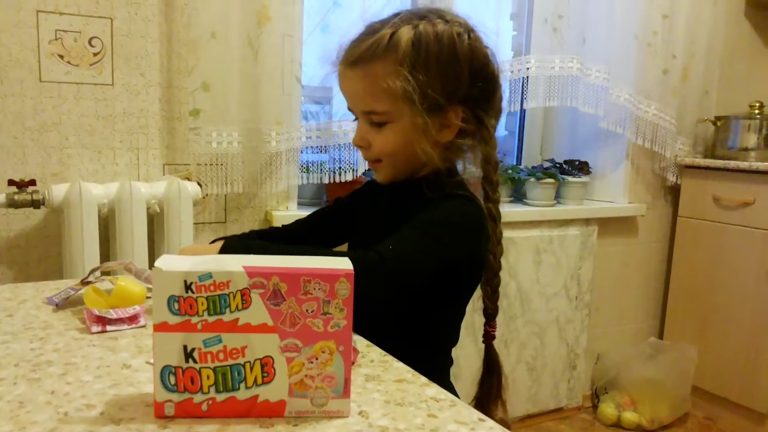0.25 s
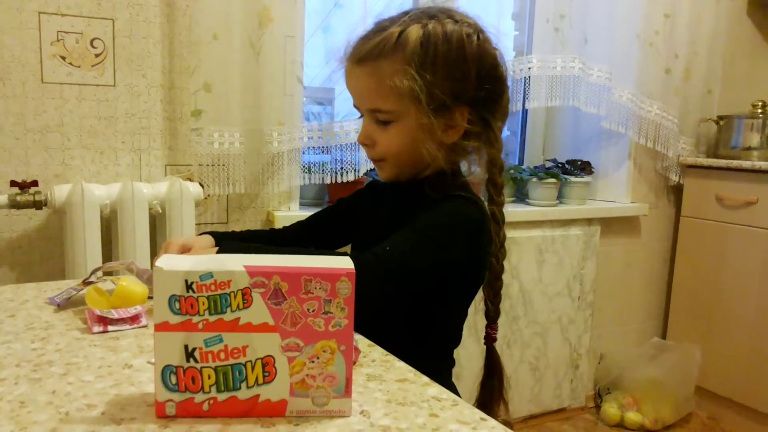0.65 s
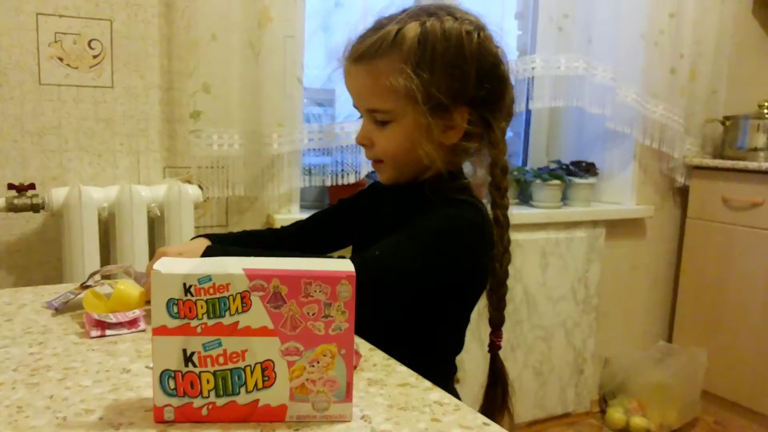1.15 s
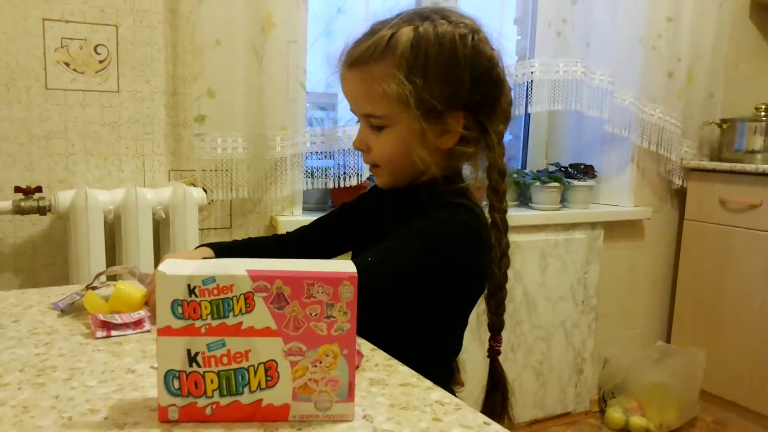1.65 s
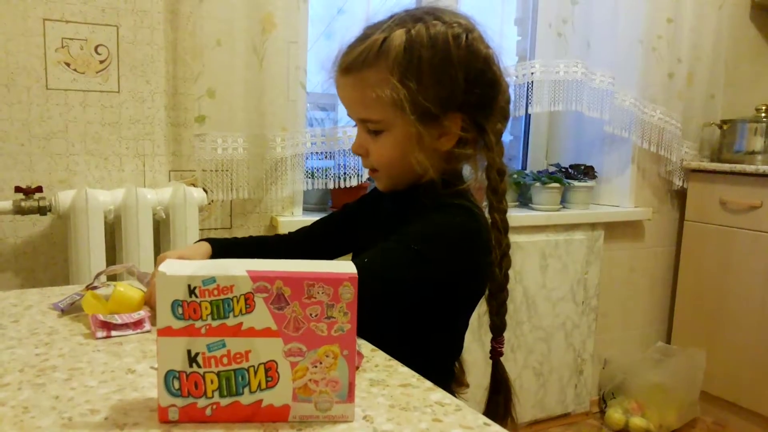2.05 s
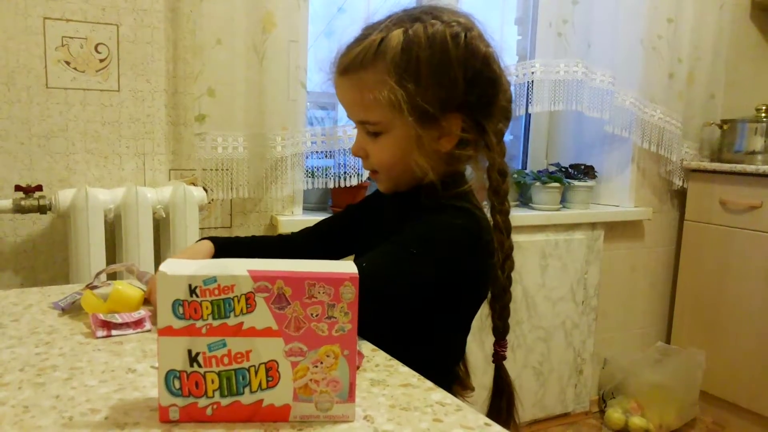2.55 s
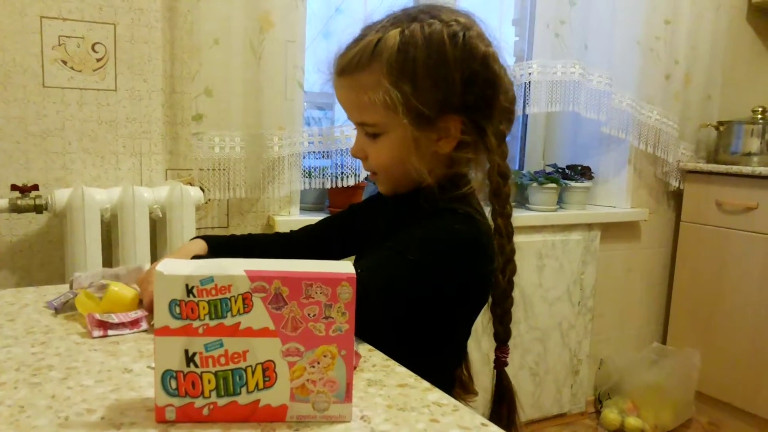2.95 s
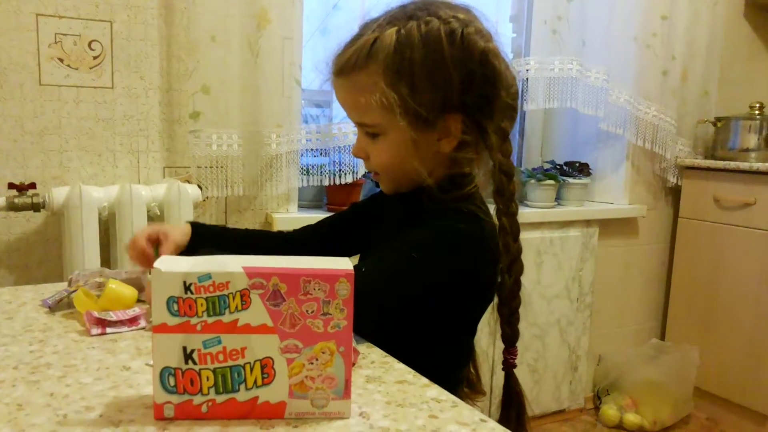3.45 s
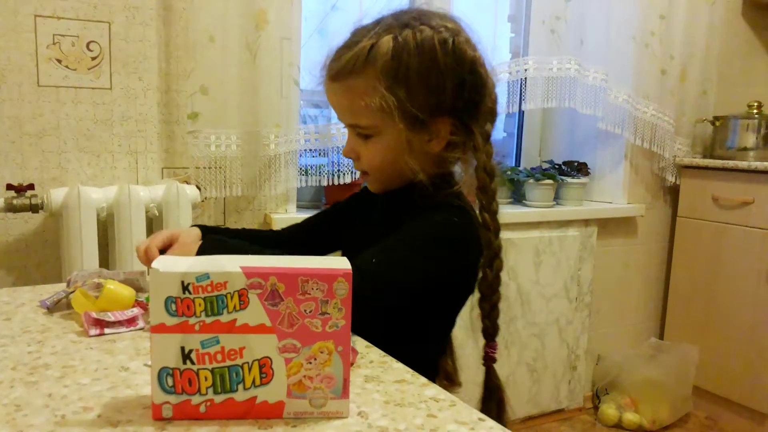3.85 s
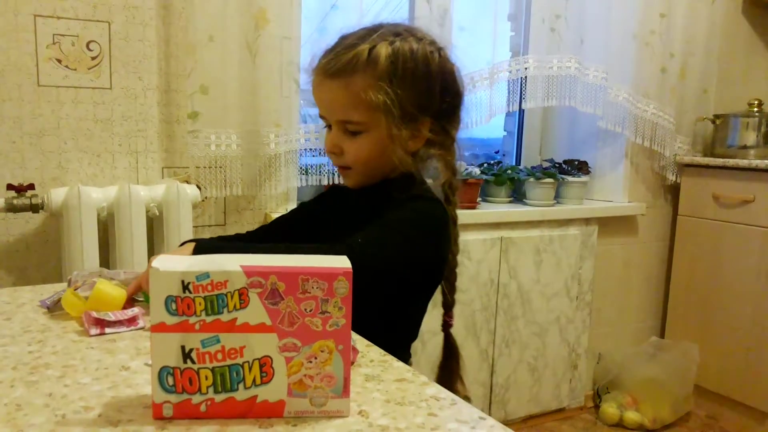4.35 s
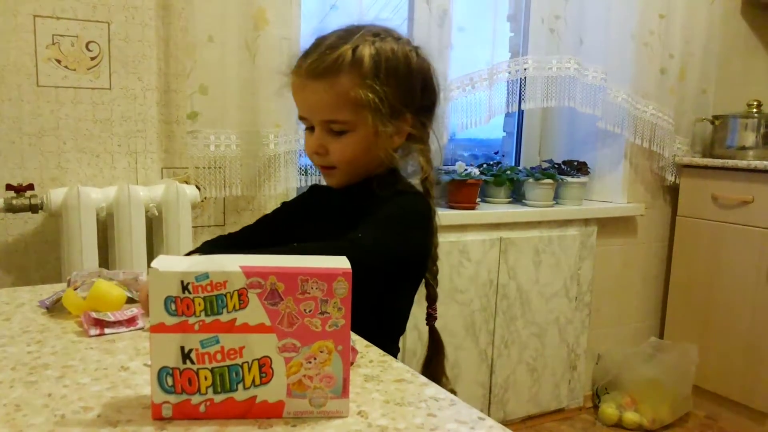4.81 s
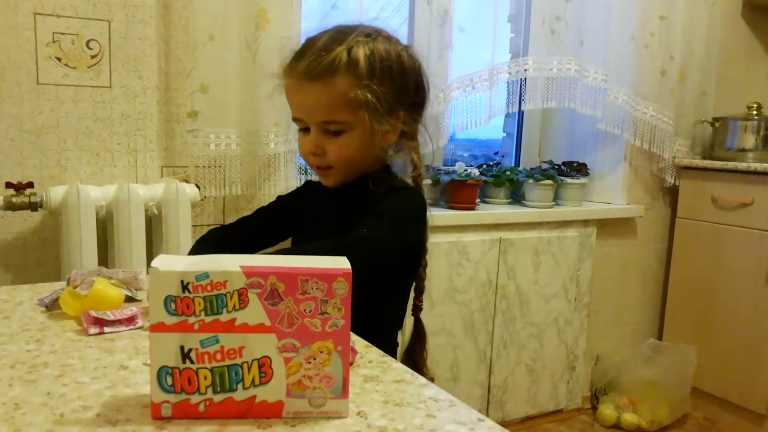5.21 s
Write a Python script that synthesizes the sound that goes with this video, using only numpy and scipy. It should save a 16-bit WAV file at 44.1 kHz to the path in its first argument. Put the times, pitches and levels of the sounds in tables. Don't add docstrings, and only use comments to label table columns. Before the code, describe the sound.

Light plastic ticks and faint scrapes beside a cardboard box grow into busy, brighter clattering of little toy parts in a small hard room.

```python
import sys
import numpy as np
from scipy import signal
from scipy.fft import rfft, irfft
from scipy.io import wavfile
from scipy.ndimage import uniform_filter1d

SR = 44100
rng = np.random.default_rng(int(sys.argv[2]) if len(sys.argv) > 2 else 0)


def volts(x):
    e = np.asarray(x, float) / 20
    return 10 ** e


def bounce(signal):
    frames = np.transpose(np.atleast_2d(signal))
    limited = np.clip(frames, -1, 1)
    pcm = np.round(limited * 32767).astype(np.int16)
    wavfile.write(sys.argv[1], SR, pcm)


N = 241529

# (frequency [Hz], width [Hz], level [dB])
BOX = [(507, 74, -3.5), (771, 38.6, 5), (620, 140, -9), (308, 140, -11)]
# (frequency [Hz], width [Hz], level [dB])
SHELL = [(994, 28, -20.5), (1070, 46, -1.5), (1310, 125, 1.5), (1500, 12, -19.5), (1690, 68, -5),
         (2006, 110, 0.5), (2340, 150, -4), (2558, 91.5, -0.5), (2810, 240, -8.5)]
# (low end [Hz], high end [Hz])
EDGE = [(3400, 8200), (8000, 15000)]
CRACK_BAND, AIR_BAND = EDGE
# (frequency [Hz], width [Hz], level [dB])
LID = [(1300, 270, -1.5), (2340, 240, 0.5), (3640, 250, -5), (4790, 180, -20), (5420, 260, -15),
       (5980, 280, -18), (7130, 210, -18), (7740, 280, -15)]
CUP = [(1120, 290, -1), (2290, 300, -2), (3100, 190, -2), (3680, 210, -1), (5050, 280, -9), (6030, 320, -5),
       (6900, 270, -13), (8030, 350, -10), (8970, 280, -21)]
PEG = [(1740, 660, -3), (2400, 390, -1), (3700, 230, -5), (4920, 270, -12), (5970, 210, -15),
       (6900, 380, -11), (8370, 250, -29)]
CAP = [(1660, 370, 2), (2320, 160, -6), (3670, 220, -5), (4870, 200, -14), (5340, 270, -17),
       (6300, 150, -22), (6740, 230, -21), (7610, 220, -19)]
HALF = [(1060, 360, 0), (2600, 260, -1), (3700, 230, -10), (5320, 380, -14), (6400, 530, -19),
        (6960, 220, -21), (7310, 170, -19.5)]
BASE = [(1360, 300, -0.5), (2630, 370, -2.5), (4260, 480, -19), (5200, 290, -20), (5600, 140, -25),
        (6100, 220, -20), (6800, 230, -18.5), (7600, 300, -21)]
DOME = [(1350, 487, 1.5), (2410, 430, -1), (3650, 140, -8), (4230, 200, -7), (5270, 310, -8),
        (6020, 220, -10), (7020, 220, -6), (7460, 380, -10), (8560, 220, -12.5), (8930, 500, -10)]
WHEEL = [(1330, 420, 0), (2370, 590, -10), (4110, 500, -20), (5590, 290, -19)]
CLIP_ON = [(1060, 530, 3), (2520, 300, 0), (3450, 260, -10), (4360, 190, -18), (5300, 180, -15),
           (5970, 240, -16), (7040, 310, -24), (7830, 490, -27)]
STUD = [(1290, 420, 1), (2680, 320, -8), (3650, 240, -5.5), (5370, 370, -20)]


def taps():
    # (frequency [Hz], width [Hz], level [dB])
    lugs = [(3160, 200, 6), (3750, 130, 0), (4270, 140, -3), (5300, 260, -1), (6210, 900, 7.5),
            (7440, 700, 7.5)]
    # (time [s], tones of the part)
    own_parts = [(4.154, LID), (4.242, CUP), (4.766, PEG), (4.703, CAP), (3.287, HALF), (3.563, BASE),
                 (3.57, DOME), (2.305, WHEEL), (1.483, CLIP_ON), (3.347, STUD)]
    out = np.zeros(N + SR)
    t = np.arange(SR // 12) / SR
    rows = blows()
    chances = rng.standard_normal((len(rows), 3, 12, 3))
    noise = rng.standard_normal((len(rows), len(t)))
    rattle = noise * np.exp(-t / 0.0013)
    fizz = noise * (1 - np.exp(-t / 0.00066)) * np.exp(-t / 0.0035)
    rattles = unit(band(rattle, 914, 2990))
    airs = unit(band(fizz, *AIR_BAND))
    cracks = unit(band(rattle, *CRACK_BAND) + 0.2 * ring(fizz, 9320, 2200))
    for row, chance, loose, crack, air in zip(rows, chances, rattles, cracks, airs):
        s, db, sharp_db, hz, thud_db, air_db = row
        push_s = 0.00031 * volts(-.35 * (sharp_db + 11.5))
        soft = 1 - np.exp(-(t / push_s) ** 2)
        piece = 0.86 * np.sin(2 * np.pi * hz * t) * np.exp(-t / 0.0026)
        shell = strike(SHELL, chance[0], t, widen=1.41, scatter_db=3) + piece
        box = volts(thud_db - 7) * strike(BOX, chance[1], t, widen=0.77, scatter_db=4)
        tips = 0.9 * strike(lugs, chance[2] * [1, 1, .2], t, widen=1.05, scatter_db=4)
        for when, part in own_parts:
            if abs(when - s) < .003:
                own = strike(part, chance[0] * [0, 0, .3], t, widen=0.65, scatter_db=0)
                shell = 0.28 * shell + 1.48 * own
                tips, loose = 0.2 * tips, 0.3 * loose
                crack, box = 0.6 * crack, 0.45 * box
        edge = volts(sharp_db + 9.0) * (crack + tips) + volts(air_db + 8) * air
        i = int(s * SR)
        out[i:i + len(t)] += volts(db - 0.5) * unit(soft * (shell + box + 0.81 * loose) + edge)
    return signal.sosfilt(signal.butter(2, 320, "high", fs=SR, output="sos"), out[:N])


def blows():
    # (time [s], peak [dB], sharpness [dB], ring of the hit piece [Hz])
    light = [(.117, -37.5, -53, 1510), (0.187, -42, -20, 1310), (.209, -31.5, -22, 1500),
             (0.413, -48, -28, 1700), (0.42, -32.5, -33, 1660), (.43, -34.5, -29, 1100),
             (.792, -36, -17.5, 1180), (0.843, -36, -36, 1290), (.878, -29.5, -22, 1580),
             (.938, -29.5, -47, 1200), (1.746, -36.5, -31, 1410), (1.815, -23.5, -13, 1120),
             (1.909, -43, -26, 1290), (1.925, -35, -23, 1200), (1.936, -26, -21, 1310),
             (1.954, -26, -29, 1310), (2.257, -43, -35, 1060), (2.269, -21.5, -27, 1400),
             (2.533, -32.5, -37, 1350), (2.639, -37, -29, 1300), (2.658, -24.5, -37, 1230),
             (2.706, -28, -18.5, 1300), (2.887, -25.5, -29, 1380), (3.054, -28.5, -25, 1250),
             (3.126, -26.5, -17.5, 1370), (3.145, -19.5, -20, 1310), (3.182, -29, -33, 1656),
             (3.237, -36.5, -25, 2120)]
    # (time [s], peak [dB], sharpness [dB], ring [Hz])
    rummage = [(3.347, -18, -20, 1310), (3.429, -31, -23, 1070), (3.563, -8, -18, 1370),
               (3.647, -18, -27, 1310), (3.658, -20, -20, 2890), (3.695, -22.5, -13, 1310),
               (3.72, -19.5, -20, 1330), (3.796, -24, -19, 2050), (4.231, -27, -3, 2280),
               (4.465, -28, -37, 1310), (4.565, -44.5, -15, 1310), (4.63, -35.5, -31, 2780),
               (4.721, -32, -24, 1310), (4.804, -20, -16, 1580), (4.83, -24, -27, 1500),
               (4.854, -29, -28, 2340), (4.896, -32, -30, 1440), (4.93, -22.5, -20.5, 990),
               (4.966, -27, -36, 1020), (4.993, -26, -35, 1150), (5.01, -20, -22, 1380),
               (5.082, -27, -25, 1310), (5.114, -20.5, -18, 2300), (5.124, -22, -18, 1270),
               (5.295, -29.5, -36, 1690), (5.312, -33, -16, 1400), (5.397, -26, -28, 1480),
               (5.441, -30.5, -21, 1730), (5.455, -30, -30, 1680), (5.469, -32, -29, 1370)]
    # (time [s], peak [dB], sharpness [dB], ring [Hz], thud [dB])
    knocks = [(.075, -40.5, -47, 1260, -9), (.452, -22.5, -25, 1670, -9.5), (.516, -33.5, -30, 614, -22),
              (.605, -27.5, -18, 1817, -11.5), (0.615, -32.5, -15, 1400, -8.5), (.699, -51, -20, 620, -7),
              (1.055, -23, -24, 1180, -3.5), (1.061, -24, -25, 1350, -22), (1.755, -40, -36, 1460, -12),
              (2.085, -47, -21, 1370, -10), (2.305, -15, -21, 1285, -9.5), (2.316, -21, -9.5, 1280, -14),
              (2.56, -38, -26, 1310, -8), (2.597, -38, -46, 1320, -23), (2.816, -34, -22, 1300, -16),
              (2.876, -31, -22, 1310, -6), (2.913, -19.5, -20.5, 1220, -18), (3.041, -34, -23, 1170, -22),
              (3.1, -26.5, -12, 3680, -19), (3.388, -28.5, -34, 1460, -5), (3.769, -24, -11, 1360, -4),
              (4.421, -30.5, -32, 1950, -9), (4.653, -26.5, -34, 1070, -16)]
    # (time [s], peak [dB], sharpness [dB], ring [Hz], air [dB])
    clacks = [(1.038, -26, -12.5, 2310, -33), (1.483, -23.5, -17, 1240, -22.5),
              (3.287, -12.5, -22.5, 1590, -30), (3.322, -24, -16, 1310, -24), (3.506, -33, -6, 2120, 6),
              (3.5699, -4, -2, 2680, -21), (3.725, -21, -23, 2290, -30), (4.154, -10.5, -10, 3654, -34),
              (4.194, -16, -12.5, 1370, -20.5), (4.242, -10, -15, 2230, -32),
              (4.278, -24.5, -16, 3700, -24), (4.703, -16.5, -15.5, 1690, -43),
              (4.741, -20, -21, 1750, -36), (4.767, -13, -15, 1860, -29), (4.819, -21, -18, 1780, -35.5),
              (4.902, -41, -20, 6550, -20), (4.98, -43, -14, 3000, 14), (5.141, -26, -11, 1360, -25),
              (5.168, -23.5, -20, 1396, -26), (5.178, -29, -17, 2580, -21), (5.195, -21.5, -20, 1765, -28),
              (5.344, -31.5, -39, 2600, -28)]
    thud_db, air_db = -23.5, -35
    rows = [(*b, thud_db, air_db) for b in light + rummage]
    rows += [(*b, air_db) for b in knocks]
    rows += [(*b[:-1], thud_db, b[-1]) for b in clacks]
    return rows


def strike(modes, chance, t, widen, scatter_db):
    hz, width, db = np.transpose(modes)[:, :, None]
    push, detune, phase = chance[:len(modes)].T[:, :, None]
    fade = np.exp(-np.pi * width * widen * t)
    waves = np.sin(2 * np.pi * hz * (1 + .025 * detune) * t + phase) * fade
    return unit(np.sum(volts(db + scatter_db * push) * waves, axis=0))


def slide():
    drag, sharp, rub = effort()
    grip = stutter(rate=47, depth_db=3.0)
    ticks = .45 * slips(160, spread_db=4)
    hail = (slips(3000, spread_db=4.0) + ticks) * grip
    shell = body(hail, SHELL, widen=2.1) + 0.46 * ring(hail, 3720, 396) + 0.33 * hail
    edge = band(hail, *CRACK_BAND) + 0.1 * band(hail, *AIR_BAND)
    edge += 0.2 * ring(hail, 11000, 3000) + 0.23 * ring(hail, 5100, 610)
    box = body(slips(900, spread_db=4.0) * grip, BOX, widen=0.8)
    return level(band(shell, 670, 3100), -6.5) * drag + level(edge, -16) * sharp + level(box, -7) * rub


def effort():
    # (time of full strength [s], hold [s], level [dB], edge share [dB], box share [dB])
    drags = [(.01, 0.078, -58, -13, -9.5), (0.237, 0.073, -56.5, -12, -4), (0.877, 0.15, -46.5, -12, -6.5),
             (1.027, 0.024, -53, -13, -13), (1.224, 0.16, -60.5, -6, 3.5), (1.518, 0.012, -59.5, 0, 6.5),
             (1.761, 0.09, -48, -9, -3.5), (1.947, 0.036, -40.5, -16, -6.5), (2.315, 0.008, -34, -8.5, -10),
             (2.512, 0.066, -59, 3, -1), (2.681, 0.061, -40.5, -6.5, -13), (2.782, 0.14, -54, -3, 5.5),
             (2.92, 0.053, -39.5, -16, -15), (3.037, 0.17, -41.5, -11, -29), (3.302, 0.13, -40, -6, -18),
             (3.473, 0.041, -53.5, 9.5, -6), (3.624, 0.17, -40.5, -4, -8), (4.245, 0.1, -30, -14, -15.5),
             (4.466, 0.041, -35.5, -6.5, -7), (4.65, 0.03, -47, -16, 0.5), (4.785, 0.085, -40, -16, -14),
             (4.922, 0.084, -33, -18, -25), (5.004, 0.2, -31.5, -12, -15), (5.321, 0.1, -39.5, -8.5, -16)]
    rise_db_s, fall_db_s = 657, 257
    power = np.zeros((3, N))
    t = np.arange(N) / SR
    skid_db, skid_edge_db, skid_box_db = -18, 8.5, -13
    skid_wait_s, skid_fade_db_s = 0.0043, 388
    for s, db, sharp_db, *_ in blows():
        i = int((s + skid_wait_s) * SR)
        after = t[:max(min(SR // 4, N - i), 0)]
        shares = volts(np.array([[0], [sharp_db + skid_edge_db], [skid_box_db]]))
        skid = volts(db + skid_db - skid_fade_db_s * after)
        power[:, i:i + len(after)] += (shares * skid) ** 2
    for s, hold, db, edge_db, box_db in drags:
        near = slice(max(int(s * SR) - SR // 5, 0), int((s + hold) * SR) + SR // 3)
        early = np.maximum(s - t[near], 0)
        late = np.maximum(t[near] - s - hold, 0)
        shape = volts(db - rise_db_s * early - fall_db_s * late)
        power[:, near] += (volts(np.array([[0], [edge_db], [box_db]])) * shape) ** 2
    return uniform_filter1d(np.sqrt(power), size=300, axis=1)


def slips(rate, spread_db):
    hit = rng.random(N) < rate / SR
    size = np.minimum(rng.exponential(size=N), 4)
    sign = np.sign(rng.standard_normal(N))
    return level(hit * sign * volts(spread_db * size), 0)


def stutter(rate, depth_db):
    k = int(SR / rate)
    steps = np.repeat(rng.standard_normal(N // 200), k)
    return volts(depth_db * uniform_filter1d(steps, k)[:N])


def rubs():
    # (time [s], length [s], level [dB], centre
    # [Hz], width [Hz])
    short_rubs = [(0.98, 0.026, -53, 770, 50), (1.259, 0.023, -58, 476, 44), (1.267, 0.014, -55.5, 770, 60),
                  (1.351, 0.017, -56, 1060, 300), (1.385, 0.033, -60.5, 510, 39), (1.38, 0.016, -57, 770, 60),
                  (0.424, 0.008, -42, 1570, 550), (1.82, 0.024, -42, 1310, 450),
                  (1.486, 0.0063, -43.5, 1100, 720), (3.278, 0.006, -48, 1700, 1200),
                  (1.978, 0.034, -42.5, 1280, 340), (2.708, 0.017, -36, 1270, 247),
                  (2.879, 0.0074, -37, 1310, 230), (4.324, 0.016, -31, 1300, 340),
                  (4.49, 0.017, -30, 1325, 120), (4.651, 0.013, -43, 2740, 380),
                  (4.658, 0.0041, -59, 1000, 450), (5.027, 0.066, -39.5, 1240, 310),
                  (5.108, 0.02, -40, 1440, 450), (0.58, 0.0039, -55, 570, 220), (0.7, 0.0051, -58, 600, 250),
                  (2.94, 0.031, -48, 4060, 1140),
                  (4.172, .014, -43, 5700, 1300), (4.212, .014, -46, 5900, 1500), (4.3, .03, -46, 4900, 1200),
              (2.715, .02, -54, 4300, 1300), (3.15, .025, -56, 5000, 2000), (.95, .05, -53, 2300, 1100),
              (3.515, .01, -52, 9000, 3500), (3.8, .03, -45, 2050, 500), (4.182, .02, -42, 4280, 180),
              (4.17, .012, -53, 10000, 2500), (4.21, .016, -52, 11600, 3400),
              (4.265, .022, -49, 12100, 3400), (4.258, .011, -44, 6150, 900), (5.03, .032, -46, 7500, 1300),
              (5.028, .03, -38, 2440, 380), (5.02, .025, -44, 3740, 300), (5.11, .028, -40, 2390, 420),
              (5.145, .033, -51, 7700, 1500), (5.185, .03, -46, 4350, 900), (4.5, .02, -48, 3660, 300),
              (4.512, .01, -41, 1045, 90), (3.37, .03, -45, 2610, 500), (3.74, .02, -51, 12400, 3000),
              (3.735, .02, -49, 7200, 1800), (3.78, .015, -51, 6500, 2000), (.465, .014, -55, 5000, 2000),
              (1.065, .016, -55, 5500, 2500), (5.19, .025, -57, 11500, 3400)]
    t = np.arange(N) / SR
    hail = slips(4000, spread_db=2.5)
    out = np.zeros(N)
    for s, length, db, hz, width in short_rubs:
        tone = ring(ring(hail, hz, width), hz, 3 * width)
        out += level(tone, db) * np.exp(-((t - s) / length) ** 2)
    return out


def room(x):
    # (frequency [Hz], time to fall by 60 dB [s], level [dB])
    tail_bands = [(351, 0.34, 5), (980, 0.15, -2), (2800, 0.26, -5.5), (6620, 0.29, 4.5), (11700, 0.37, -6)]
    t = np.arange(SR // 2) / SR
    early = volts(-13.5 - 60 * t / 0.099)
    tail = np.zeros(len(t))
    for hz, t60, db in tail_bands:
        noise = ring(rng.standard_normal(len(t)), hz, 1.13 * hz)
        tail += (volts(db - 60 * t / t60) + early) * level(noise, 10 * np.log10(hz))
    tail *= 1 - np.exp(-t / 0.00026)
    tail *= volts(-1.5) / np.sqrt(np.sum(tail ** 2))
    tail[0] += 1
    tail[int(0.0038 * SR)] += volts(-12.5)
    return signal.fftconvolve(x, tail)[:N]


def hum():
    # (frequency [Hz], level per Hz [dB])
    colour = [(12, -26.5), (20, -66), (112, -6.5), (219, -3), (333, -8), (382, -9), (581, -13), (649, -9.5),
              (746, -17), (1300, -16), (3000, -25.5), (3260, -23), (5380, -27.5), (5850, -30.5),
              (15500, -22.5)]
    hz, db = np.transpose(colour)
    f = np.arange(N // 2 + 1) * SR / N + 1
    curve = volts(np.interp(np.log(f), np.log(hz), db))
    steady = level(irfft(rfft(rng.standard_normal(N)) * curve, N), -58)
    rumble = level(ring(ring(rng.standard_normal(N), 84, 107), 84, 107), -8.0)
    return steady + rumble * volts(-65) * stutter(rate=4.08, depth_db=4)


def ring(x, hz, width):
    return signal.lfilter(*signal.iirpeak(hz, hz / width, fs=SR), x)


def body(x, modes, widen):
    out = np.zeros(len(x))
    for k, (hz, width, db) in enumerate(modes):
        out += (-1) ** k * volts(db) * ring(x, hz, width * widen)
    return out


def band(x, lo_hz, hi_hz):
    return signal.sosfilt(signal.butter(3, [lo_hz, hi_hz], "band", fs=SR, output="sos"), x)


def level(x, db):
    return x * volts(db) / np.sqrt(np.mean(x ** 2))


def unit(x):
    return x / np.abs(x).max(axis=-1, keepdims=True)


def scene():
    parts = taps() + slide() + rubs()
    blend = np.sin(np.pi * 7.3 * np.arange(N) / SR) ** 2
    return (room(parts * blend) + room(parts * (1 - blend)) + hum())[None]


def top_cut(x):
    return signal.sosfilt(signal.butter(12, 16970, fs=SR, output="sos"), x)


def record(dry):
    mix = signal.sosfilt(signal.ellip(7, .2, 34, 15650, fs=SR, output="sos"), dry)
    return top_cut(mix)


dry = scene()
out = record(dry)
bounce(out)
```